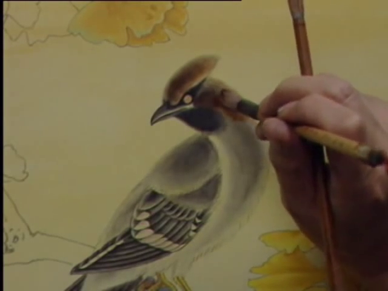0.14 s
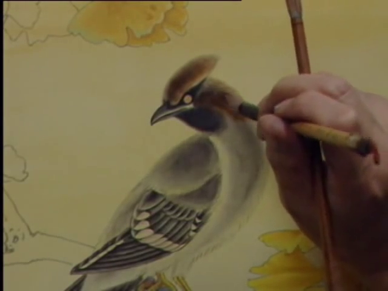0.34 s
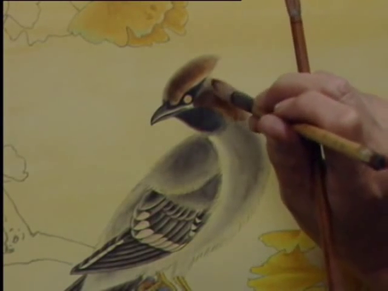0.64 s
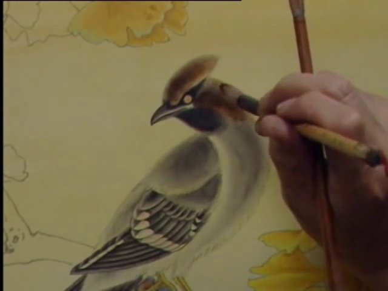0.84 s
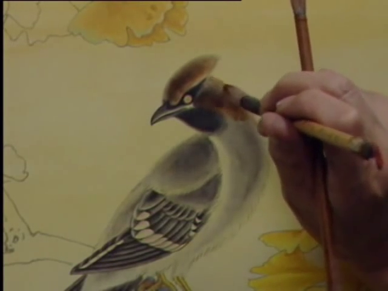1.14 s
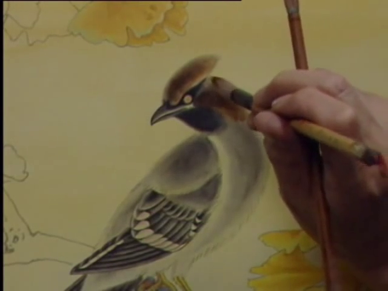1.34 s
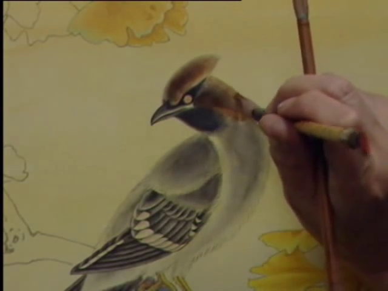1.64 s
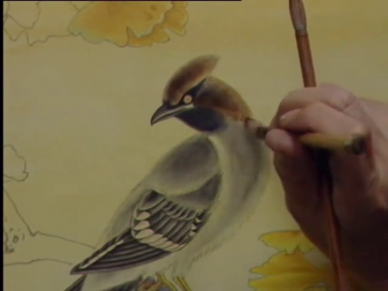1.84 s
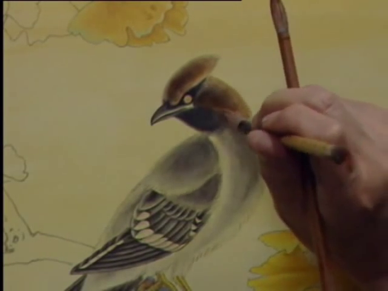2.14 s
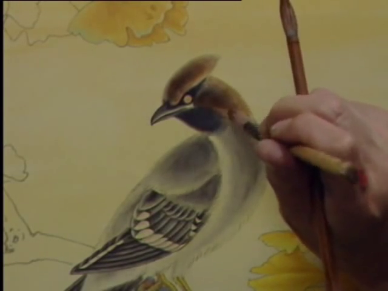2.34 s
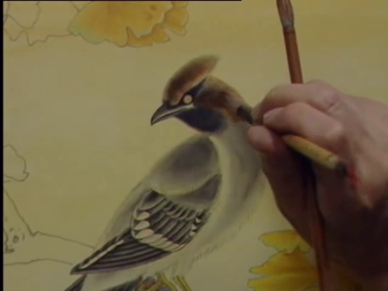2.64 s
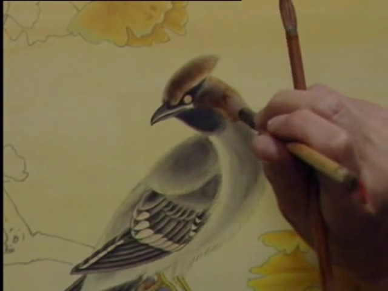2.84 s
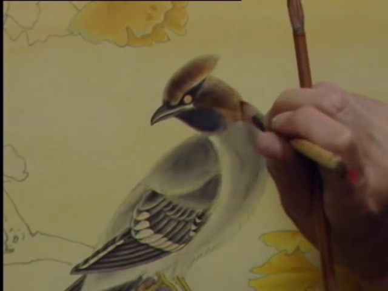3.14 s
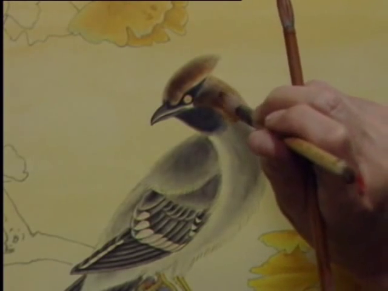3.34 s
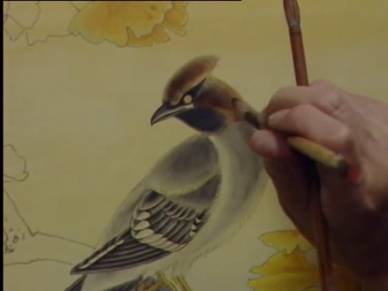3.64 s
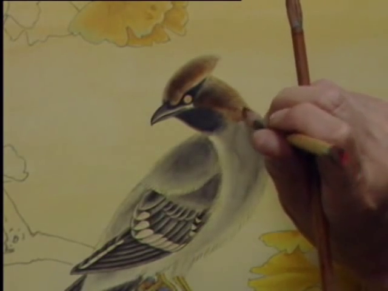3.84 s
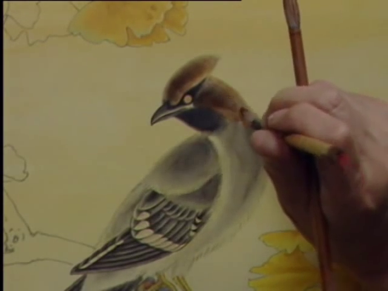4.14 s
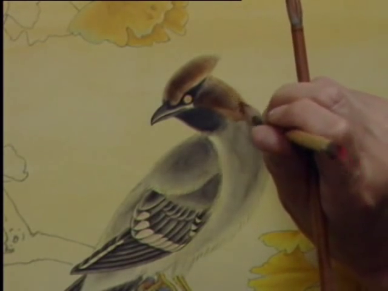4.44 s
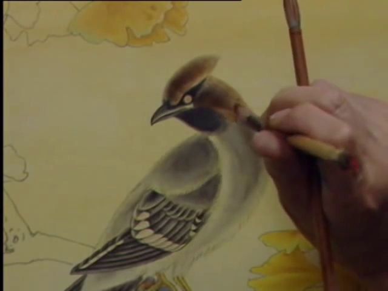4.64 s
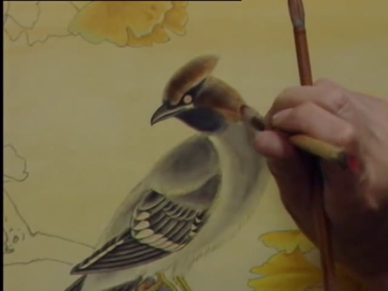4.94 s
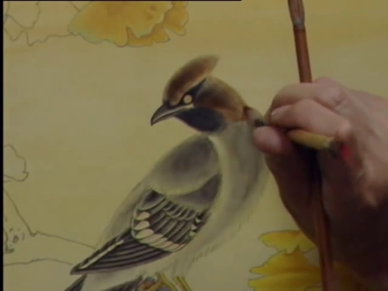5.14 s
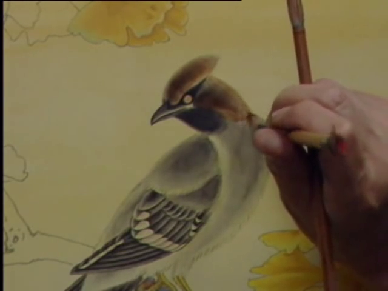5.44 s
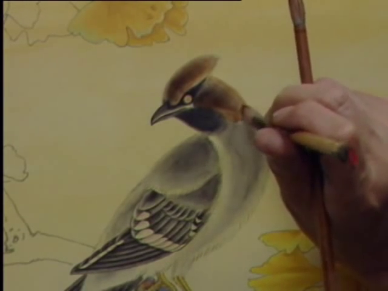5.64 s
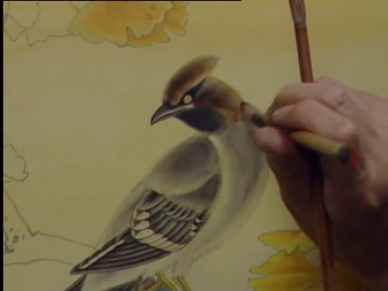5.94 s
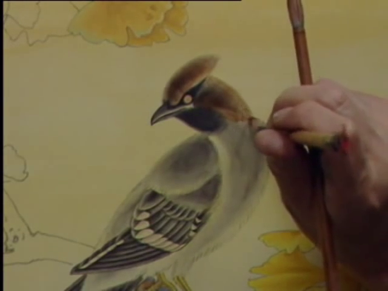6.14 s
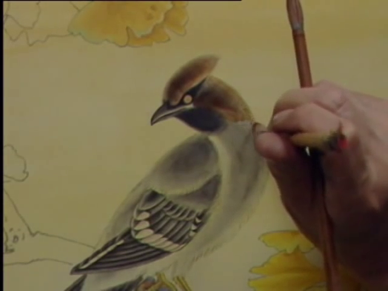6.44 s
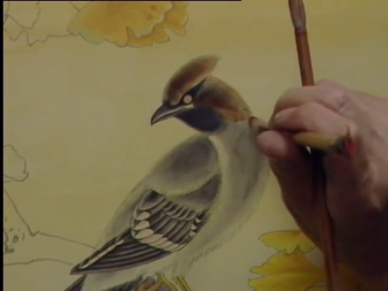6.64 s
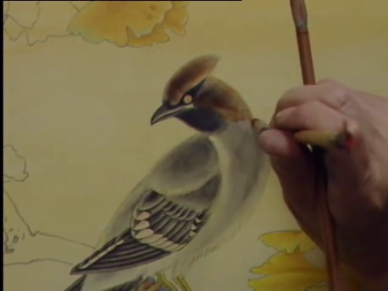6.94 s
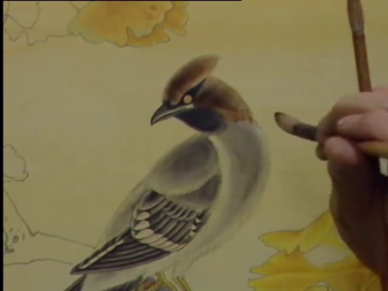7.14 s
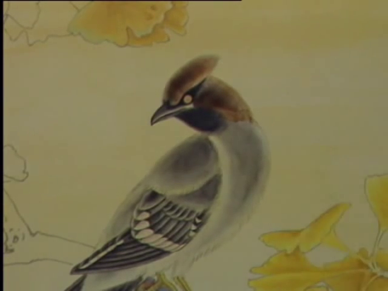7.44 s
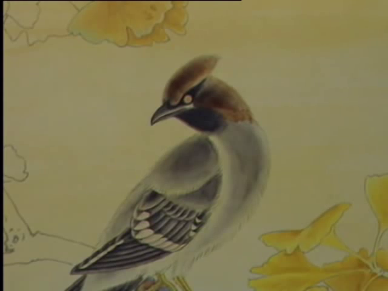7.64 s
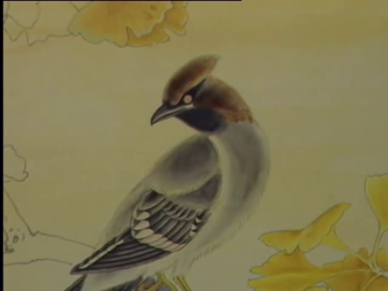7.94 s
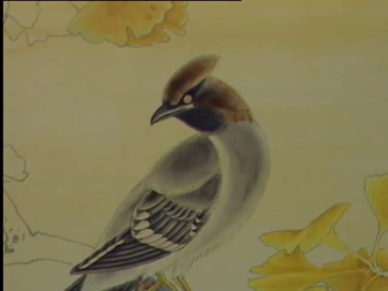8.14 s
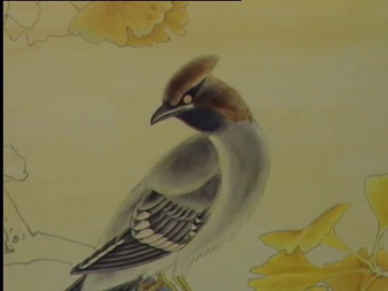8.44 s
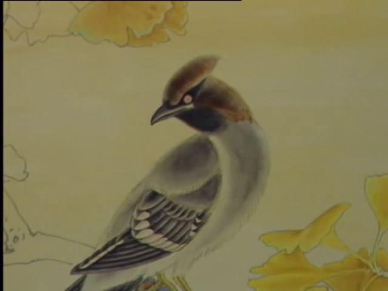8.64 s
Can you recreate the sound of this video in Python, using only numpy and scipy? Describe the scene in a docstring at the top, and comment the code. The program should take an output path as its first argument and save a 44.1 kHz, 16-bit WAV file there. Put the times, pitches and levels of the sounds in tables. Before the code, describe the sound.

Steady mains hum and faint hiss in a quiet small room; a tiny brush tick, a hand slides off paper, a bamboo handle clacks down, cloth sweeps.

```python
"""A bamboo handle is put down with a sharp clack on the table of a small room where a painter works quietly.
Before it, brushes tick faintly in the hand and the hand slides off the paper; after it, a sleeve sweeps the table.
Blows are filtered knocks with a faint ring of decaying sines; ticks are noise bursts, strokes and cloth shaped noise.
The camera close by carries mains hum and buzz summed from harmonics, noise for hiss and rumble, and a thin sine whine.
"""
import sys
import numpy as np
from scipy import signal
from scipy.fft import rfft, irfft
from scipy.io import wavfile
from scipy.ndimage import uniform_filter1d

SR = 44100
rng = np.random.default_rng(int(sys.argv[2]) if len(sys.argv) > 2 else 0)


def master(y):
    """Save y as 16-bit WAV."""
    cut = np.clip(np.atleast_2d(y).T, -1, 1)
    pcm = np.round(cut * 32767)  # scale
    wavfile.write(sys.argv[1], SR, pcm.astype(np.int16))


N = 387638
TIME = np.arange(N) / SR  # s
MAINS_HZ = 50


def amp(db):
    """Turns dB into an amplitude factor."""
    return 10 ** (np.asarray(db) / 20)


def unit(x):
    """Scales to rms 1."""
    return x / np.sqrt(np.mean(x ** 2) + 1e-30)


def read(points, hz):
    """Reads a table on a logarithmic frequency axis."""
    f, value = np.transpose(points)
    return np.interp(np.log(hz + 1), np.log(f + 1), value)


def add(mix, s, sound):
    """Mixes a sound in at time s."""
    part = mix[max(round(s * SR), 0):][:len(sound)]
    part += sound[:len(part)]


def noise(spectrum):
    """Noise with the given power per Hz."""
    hz = np.fft.rfftfreq(N, 1 / SR)
    white = rfft(rng.standard_normal(N))
    return irfft(white * amp(read(spectrum, hz)), N) * np.sqrt(SR / 2)


def drift(rate):
    """Slow chance of rms 1 that changes about rate times a second."""
    return unit(np.interp(TIME * rate, np.arange(N // 8), rng.standard_normal(N // 8)))


def causal(db):
    """The spectrum of the quickest causal response that has these gains, from 0 Hz up."""
    log_gain = np.log(amp(db))
    mirrored = np.r_[log_gain, log_gain[-2:0:-1]]
    return np.exp(np.conj(signal.hilbert(mirrored)))[:len(db)]


def burst(hz, octaves, t60):
    """Quickly dying noise in one broad resonance."""
    t = np.arange(SR // 4) / SR
    edges = np.minimum(hz * 2 ** (octaves * np.array([-.5, .5])), SR / 2 - 1)
    band = signal.butter(2, edges, "band", fs=SR, output="sos")
    decay = amp(-60 * t / t60)
    x = signal.sosfilt(band, decay * rng.standard_normal(len(t)))
    return x * np.linalg.norm(decay) / np.linalg.norm(x)  # the band keeps the energy of the decay


# How far a swell's pitch strays, as a share of itself.
SWELL_WANDER = .1


def swell(hz, length):
    """A soft low sound of unsteady pitch that rises and fades at once."""
    count = int(length * SR)
    pitch = hz * (1 + SWELL_WANDER * drift(149)[:count])
    return np.sin(2 * np.pi * np.cumsum(pitch) / SR) * np.hanning(count)


# Low noise of the room. Each row: frequency in Hz, power in dB per Hz.
RUMBLE_SPECTRUM = [(10, -75), (24, -71.5), (60, -77), (120, -83), (200, -89), (320, -98.5), (600, -107),
                   (1200, -118), (4000, -140)]


def rumble(apart_db=-2):
    """Low noise of the room, partly different in each channel."""
    shared = noise(RUMBLE_SPECTRUM)
    apart = np.array([noise(RUMBLE_SPECTRUM), noise(RUMBLE_SPECTRUM)])
    return (shared + amp(apart_db) * apart) / np.hypot(1, amp(apart_db))


# Noise of the preamplifier. Each row: frequency in Hz, power in dB per Hz.
HISS_SPECTRUM = [(50, -112), (800, -108), (1200, -106.5), (1700, -103.5), (2500, -102), (3600, -104.5),
                 (6400, -105.5), (7800, -110.5), (9800, -110.5), (10600, -112), (15000, -114),
                 (16000, -113)]
# Likeness of the hiss in the two channels. Each row: frequency in Hz, likeness from 0 to 1.
HISS_LIKENESS = [(100, 0), (800, 0.76), (2500, 0.99), (6000, 0.9), (9000, 0.69), (15000, 0.47)]


def hiss(waver_db=-0.05):
    """Preamplifier hiss, mostly shared by the two channels; only the shared part wavers."""
    hz = np.geomspace(50, 16000, 80)
    same = np.clip(read(HISS_LIKENESS, hz), 0, .995)
    db = read(HISS_SPECTRUM, hz)
    mid = noise(np.c_[hz, db]) * amp(waver_db * drift(3.1))
    side = noise(np.c_[hz, db + 10 * np.log10((1 - same) / (1 + same))])
    return np.array([mid + side, mid - side])


def whine(wander_hz=26, flutter=.38, level_db=-72, start_db=-4, rise_s=4):
    """The line frequency of the camera's picture: a thin unsteady whistle that creeps up and holds."""
    line_hz = 15622
    level = amp(level_db + start_db * np.maximum(1 - TIME / rise_s, 0))
    phase = 2 * np.pi * np.cumsum(line_hz + wander_hz * drift(120)) / SR
    return level * unit(np.sin(phase) * (1 + flutter * drift(75)))


# Bands where high mains harmonics buzz. Each row: centre in Hz, width in Hz, relative level in dB.
BUZZ_BANDS = [(1040, 110, -4.5), (2150, 2400, -7), (4100, 44, -1.5), (4474, 58, 4.5), (5000, 210, 0.5),
              (5400, 80, -3), (5980, 76, 2), (6080, 71, 6.5), (6410, 220, 1.5), (7060, 70, 2.5),
              (7570, 120, -5), (9600, 700, -14)]


def buzz(level_db=-68.5):
    """High mains harmonics of uneven strength, wavering slightly in pitch."""
    order = np.arange(18, 210)
    power = sum(amp(db) ** 2 * np.exp(-2 * ((order * MAINS_HZ - hz) / width) ** 2)
                for hz, width, db in BUZZ_BANDS)
    uneven = amp(rng.uniform(-3, 3, len(order)))
    lines = np.zeros(2049, complex)
    lines[order] = np.sqrt(power) * uneven * np.exp(2j * np.pi * rng.random(len(order)))
    cycle = irfft(lines)
    turns = np.cumsum(MAINS_HZ + .025 + .015 * drift(8)) / SR
    place = np.arange(len(cycle)) / len(cycle)
    return amp(level_db) * unit(np.interp(turns, place, cycle, period=1))


# Mains hum. Each row: multiple of the mains frequency, relative level in dB.
HUM_HARMONICS = [(1, 1.5), (2, 1.8), (3, -4.3), (4, -7.2), (5, -11), (6, -17), (7, -21), (8, -18),
                 (9, -21.5), (10, -21), (11, -30), (12, -24.5), (13, -28), (14, -44), (15, -35.5),
                 (16, -29.5), (17, -33)]
MAIN_SURGE_AT_S = .0118  # time of the main surge in the first mains cycle
HUM_DB = -50  # before the hum leans to the right


def hum(waver_db=0.14, early=0.35, lead_s=.0046, upper_waver_db=1.2):
    """A sharp surge of current in every mains cycle, ringing out before the next."""
    order, db = np.transpose(HUM_HARMONICS)
    circuit = causal(np.interp(np.arange(65), np.r_[0, order, 64], np.r_[0, db, -60]))
    # a weaker surge comes just before the main one
    ahead = 1 + np.clip(early, 0, .9) * np.exp(2j * np.pi * order * MAINS_HZ * lead_s)
    phase = np.angle(circuit[np.round(order).astype(int)] * ahead / np.conj(ahead))
    turns = MAINS_HZ * (TIME - MAIN_SURGE_AT_S)
    wave = np.zeros(N)
    for k, d, p in zip(order, db, phase):
        level = amp(d + upper_waver_db * min(k / 8, 1) * drift(.8))  # upper harmonics waver more
        wave += level * np.cos(2 * np.pi * k * turns + p)
    return -amp(HUM_DB + waver_db * drift(6)) * unit(wave)


# Brief dull low sounds under the hum. Each row: middle in seconds, peak level in dB, pitch in Hz.
DULL_SWELLS = [(2.022, -66, 378), (2.559, -67, 378), (2.92, -67, 469), (3.303, -67, 520), (6.453, -63, 267),
               (6.7, -54, 162), (6.689, -59, 307)]
SWELL_S = .18  # length of each


def swells():
    """Dull low sounds that come and go under the hum."""
    out = np.zeros(N)
    for s, db, hz in DULL_SWELLS:
        add(out, s - SWELL_S / 2, amp(db) * swell(hz, SWELL_S))
    return out


# Decay of the small room. Each row: frequency in Hz, t60 in seconds.
ROOM_DECAY = [(200, 1), (1800, 0.19), (4000, 0.21), (8000, 0.34), (14000, 0.042)]


def reflections(gap=0.0022):
    """Sparse reflections of random sign, each band dying at its own speed."""
    count = SR // 2
    signs = rng.choice([-1., 1.], count)
    sparse = rng.random(count) < 4000 / SR  # about 4000 a second
    taps = signs * sparse * (np.arange(count) > gap * SR)
    hz, t, z = signal.stft(taps, SR, nperseg=128)
    decay = amp(-60 * t / read(ROOM_DECAY, hz)[:, None])
    tail = signal.istft(z * decay, SR, nperseg=128)[1]
    return tail / np.linalg.norm(tail)


def room(x, wet_db=-7, side_db=-21):
    """The small room answers almost alike in both channels."""
    mid = x + amp(wet_db) * signal.fftconvolve(x, reflections())[:N]
    side = amp(wet_db + side_db) * signal.fftconvolve(x, reflections())[:N]
    return np.array([mid + side, mid - side])


# Colour of the rustling clothing. Each row: frequency in Hz, relative power in dB per Hz.
ARM_SPECTRUM = [(60, 6), (300, 4), (500, 0), (850, -5), (1500, 0), (2500, 0), (3600, -8.5), (6000, -11),
                (14000, -31)]
# Reaches of the arm. Each row: middle in seconds, added level in dB, half length in seconds.
ARM_REACHES = [(7.16, 2.5, .05), (7.57, 6, .045), (8.27, 7, .22)]
ARM_START_S, ARM_ATTACK_S, ARM_DB = 6.87, .24, -63.5


def arm(clump_db=1.4, grain_db=2):
    """Clothing rustles in soft clumps while the arm moves, more at each reach."""
    moving = np.clip((TIME - ARM_START_S) / ARM_ATTACK_S, 0, 1)
    reach_db = sum(db * np.exp(-((TIME - s) / half) ** 2) for s, db, half in ARM_REACHES)
    uneven_db = clump_db * drift(35) + grain_db * drift(400)
    return unit(noise(ARM_SPECTRUM)) * moving * amp(ARM_DB + reach_db + uneven_db)


# Small ticks and knocks of the brushes, and at 7.751 s a low knock as the handle settles. Each row: start in
# seconds, level in dB, centre in Hz.
BRUSH_TICKS = [(3.8590, -40, 5800), (3.8605, -52, 1900), (3.864, -56, 400), (7.2197, -38.5, 3200),
               (7.442, -52, 1900), (7.4485, -52, 560), (7.4893, -45, 6300), (7.751, -51, 450),
               (8.037, -54, 1310), (8.079, -53, 1600)]
# A contact dies within a set number of cycles; the higher it is, the narrower its band.
TICK_CYCLES, TICK_OCTAVES_AT_KHZ, TICK_NARROWING = 24, 1.35, .85


def ticks():
    """Light contacts: high ones are thin and short, low ones broad and longer."""
    out = np.zeros(N)
    for s, db, hz in BRUSH_TICKS:
        octaves = TICK_OCTAVES_AT_KHZ / (hz / 1000) ** TICK_NARROWING
        add(out, s, amp(db) * burst(hz, octaves, TICK_CYCLES / hz))
    return out


# Strokes, one row each: fastest moment in seconds, level there in dB, rise in seconds, fall in seconds,
# brightening in dB per octave per second.
SLIDE_OF_HAND = (7.218, -47.3, .11, .045, -40)
SWEEP_OF_SLEEVE = (8.31, -40.9, .135, .105, 19)
# Colour of the hand and of the sleeve. Each row: frequency in Hz, relative power in dB per Hz.
SKIN_SPECTRUM = [(240, -37), (400, -11), (791, -14), (1610, -1), (2150, -7), (2320, 0), (3890, -3.5),
                 (6320, -9), (13900, -32), (15000, -33)]
CLOTH_SPECTRUM = [(180, -34), (300, 2), (371, -28), (498, -7), (801, -11), (943, -13), (1060, -5.5),
                  (3610, -5), (4690, -0.5), (6840, -4), (8050, -16), (8740, -12), (15000, -34)]
# Away from its fastest moment a stroke gets quieter (dB) and duller (tilt and dulling in dB per octave).
STROKE_FADE_DB, STROKE_CURVE, STROKE_TILT_DB, STROKE_DULL_DB = 29, 1.7, .5, 4


def stroke(gesture, colour, grain_db=2.1, pivot_hz=3500):
    """Friction on a surface: noise for many tiny slips, louder and brighter when the stroke is fast."""
    fastest, db, rise, fall, brightening = gesture
    since = TIME - fastest
    slowness = np.maximum(-since / rise, since / fall) ** STROKE_CURVE
    tilt = STROKE_TILT_DB - STROKE_DULL_DB * np.minimum(slowness, 1)
    tilt = tilt + brightening * np.clip(since, -rise / 2, fall)
    hz, t, z = signal.stft(noise(colour), SR, nperseg=256)
    octaves = np.log2((hz[:, None] + 200) / pivot_hz)
    rub = signal.istft(z * amp(octaves * np.interp(t, TIME, tilt)), SR, nperseg=256)[1][:N]
    rub /= np.sqrt(uniform_filter1d(rub ** 2, size=2048))  # an even level before the fade
    return rub * amp(db - STROKE_FADE_DB * np.minimum(slowness, 10) + grain_db * drift(500))


def shudder(level_db=-40, hz=104.5, length=.075, lead=.017):
    """The table shudders under the sliding hand, just before the hand is fastest."""
    out = np.zeros(N)
    add(out, SLIDE_OF_HAND[0] - lead - length / 2, amp(level_db) * swell(hz, length))
    return out


# Blows of the bamboo handle as it lands and settles, and at 7.7106 s a sharp echo of the hardest blow. Each
# row: start in seconds, relative level in dB.
HANDLE_BLOWS = [(7.6981, -7), (7.7041, -1.5), (7.70552, 0), (7.7106, -11), (7.7332, -19), (7.7445, -24),
                (7.7508, -17), (7.7622, -24)]


def hardest_blow():
    """The start in seconds of the loudest blow."""
    return max(HANDLE_BLOWS, key=lambda row: row[1])[0]


def thud(knock_db=-48.5, knock_hz=374, knock_t60=.13, boom_db=-49, boom_hz=140, boom_t60=.45, octaves=1.5):
    """The table answers the hardest blow of the handle with a dull knock and a low boom."""
    out = np.zeros(N)
    knock = amp(knock_db) * burst(knock_hz, octaves, knock_t60)
    boom = amp(boom_db) * burst(boom_hz, octaves, boom_t60)
    add(out, hardest_blow(), knock + boom)
    return out


# Colour of the hard knock. Each row: frequency in Hz, relative gain in dB.
KNOCK_COLOUR = [(250, -44), (1000, -28), (1400, -19), (1720, -5.5), (1900, -4.5), (2150, 4), (2500, -13),
                (3150, -14), (3950, -1.8), (4500, -15), (5500, -23), (6350, -21), (7300, -34),
                (9400, -33.5), (13000, -65)]
# What handle and rest ring with afterwards. Each row: frequency in Hz, relative level in dB, t60 in seconds.
BAMBOO_MODES = [(1470, -11, .2), (1786, 11, 0.11), (1803, 7.5, 0.3), (2154, -2, .15), (3128, -10, .14),
                (3610, -2, 0.1), (3777, -2, .1), (3907, 12.5, 0.095), (4065, 2, .11), (4883, 1, 0.09),
                (4945, -1, .14), (5604, -6, 0.14), (8145, -18, .15)]


def clack(knock_db=-8.5, ring_db=-39, build=0.00087):
    """Each blow is a hard short knock; the hardest leaves the handle ringing faintly."""
    t, out = np.arange(SR // 2) / SR, np.zeros(N)
    knock = irfft(causal(read(KNOCK_COLOUR, np.fft.rfftfreq(len(t), 1 / SR))), len(t))
    blow = amp(knock_db) * knock / abs(knock).max()
    for s, db in HANDLE_BLOWS:
        add(out, s, -amp(db) * blow)
    ring = sum(amp(db - 60 * t / t60) * np.sin(2 * np.pi * hz * t) for hz, db, t60 in BAMBOO_MODES)
    add(out, hardest_blow(), amp(ring_db) * ring * (1 - np.exp(-t / build)))  # build in s
    return out


def scene():
    """The table sounds sit in the centre; hum and rumble lean to the right."""
    background = buzz() + whine() + hiss() + swells()
    leaning = hum() * amp([[-.6], [.9]]) + rumble() * amp([[-3.8], [.2]])  # dB left, right
    movement = stroke(SLIDE_OF_HAND, SKIN_SPECTRUM) + shudder() + stroke(SWEEP_OF_SLEEVE, CLOTH_SPECTRUM) + arm()
    contacts = room(ticks() + thud(), wet_db=-15) + room(clack(), wet_db=-11.3)
    return background + leaning + movement + contacts


def record(dry):
    """The band limit of the recorder: a steep low-pass at 15760 Hz."""
    lowpass = signal.firwin(1023, 15760, window=("kaiser", 9), fs=SR)
    return signal.oaconvolve(dry, lowpass[None], "same")


dry = scene()
out = record(dry)
master(out)
```